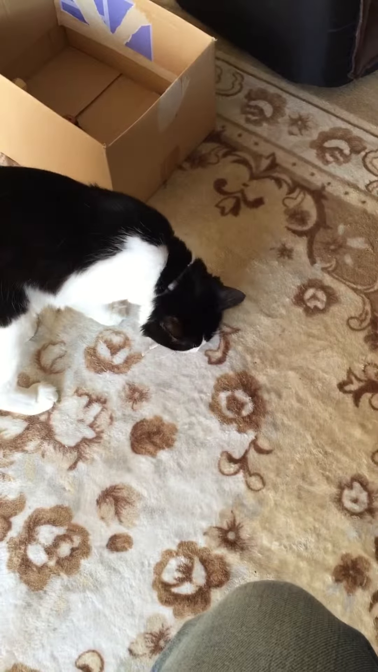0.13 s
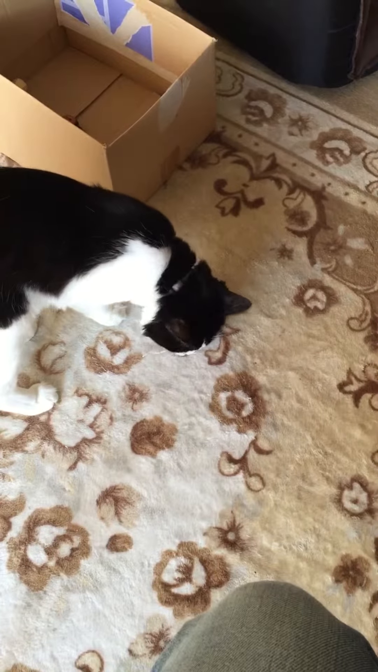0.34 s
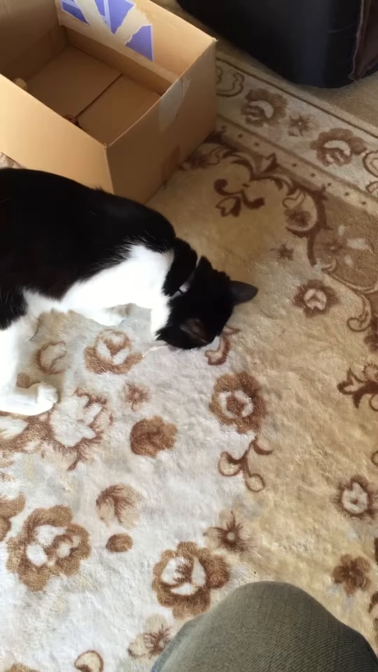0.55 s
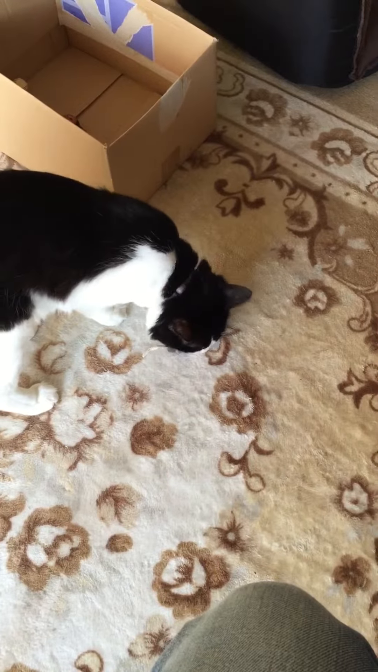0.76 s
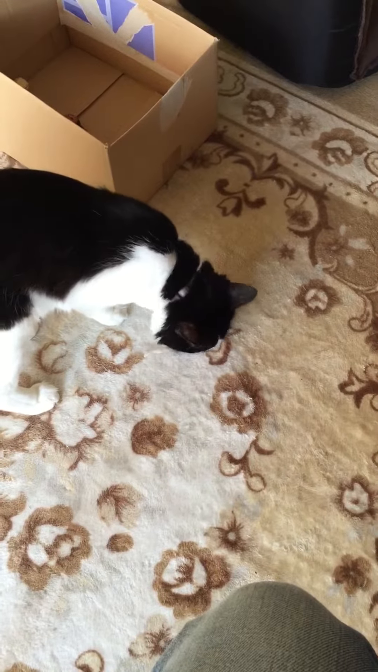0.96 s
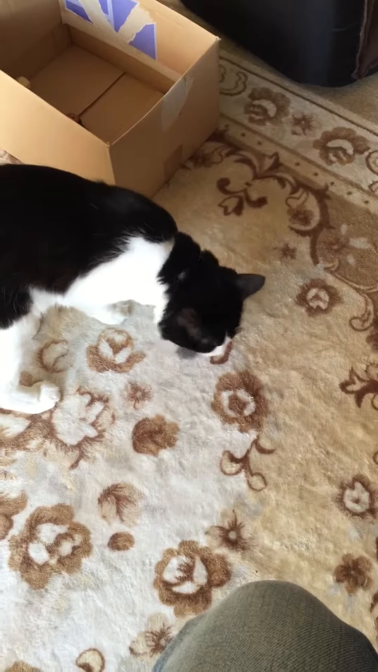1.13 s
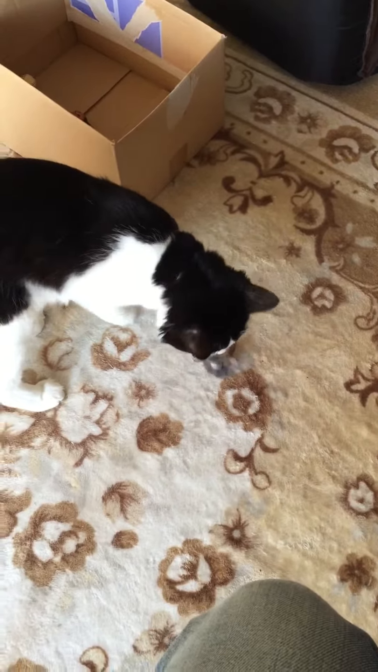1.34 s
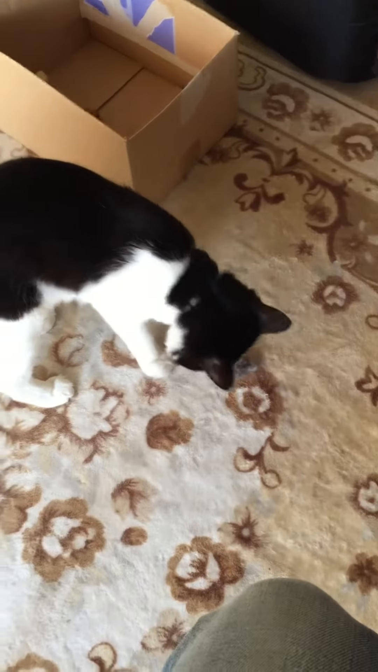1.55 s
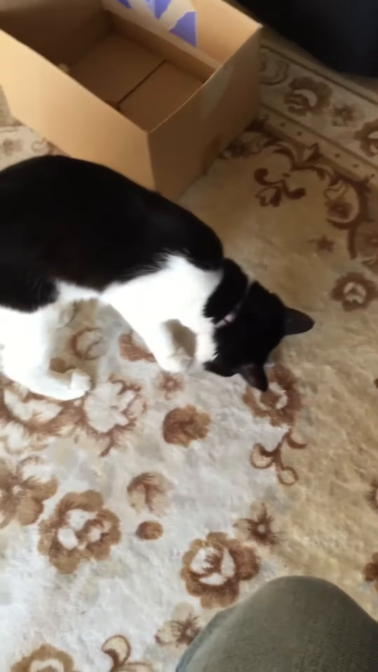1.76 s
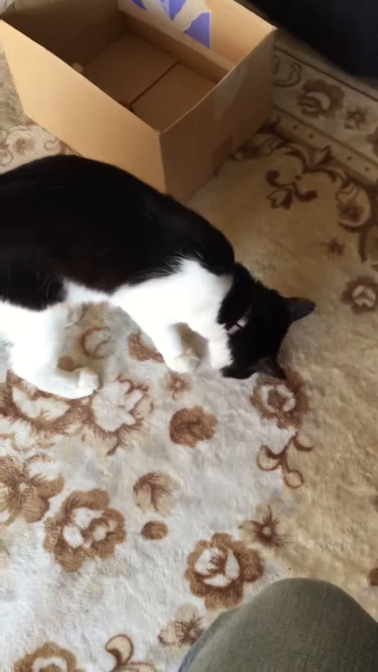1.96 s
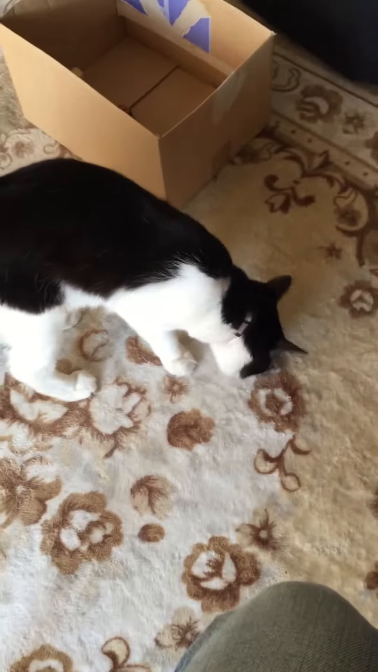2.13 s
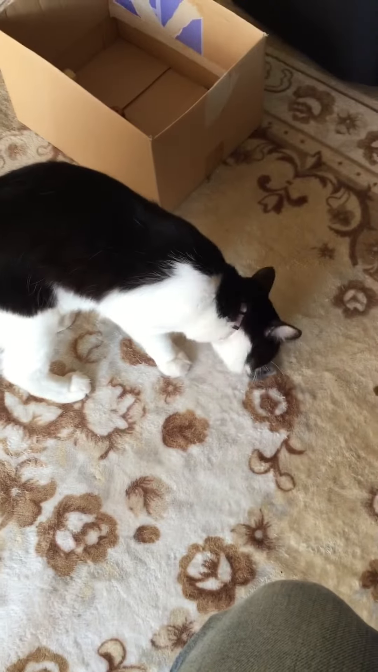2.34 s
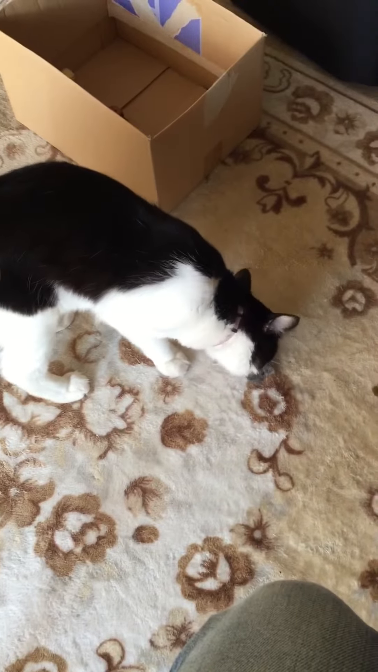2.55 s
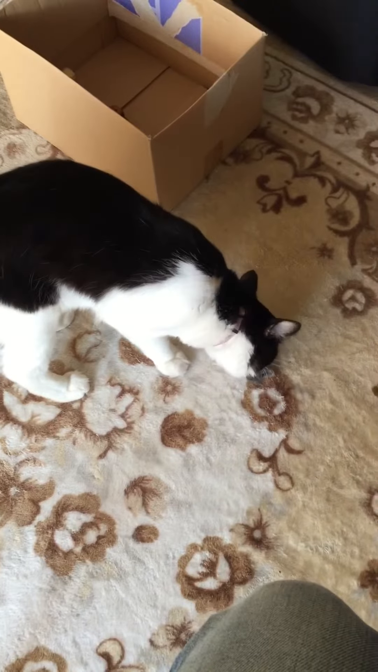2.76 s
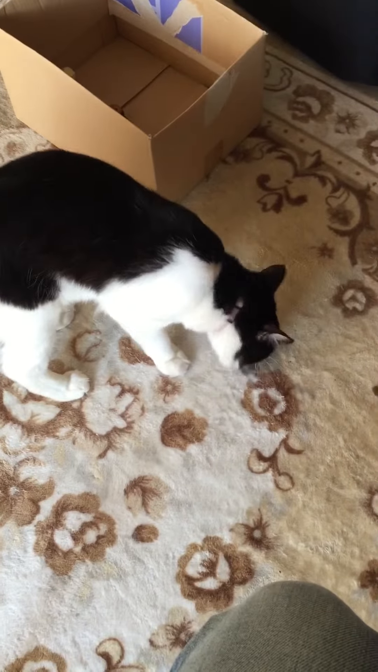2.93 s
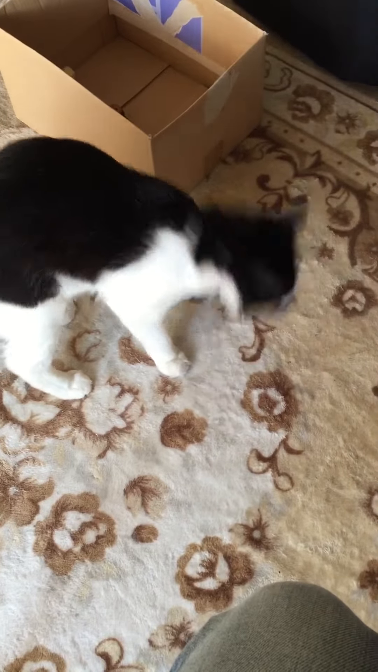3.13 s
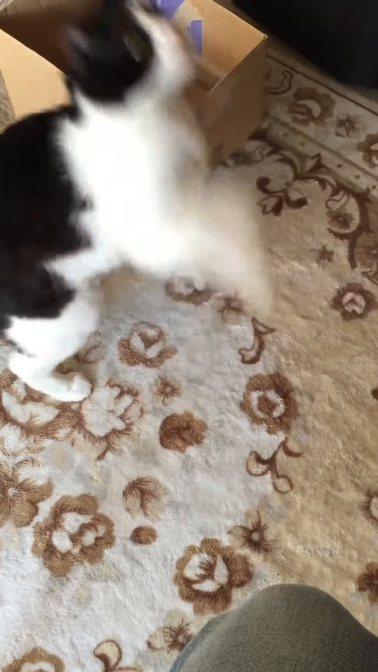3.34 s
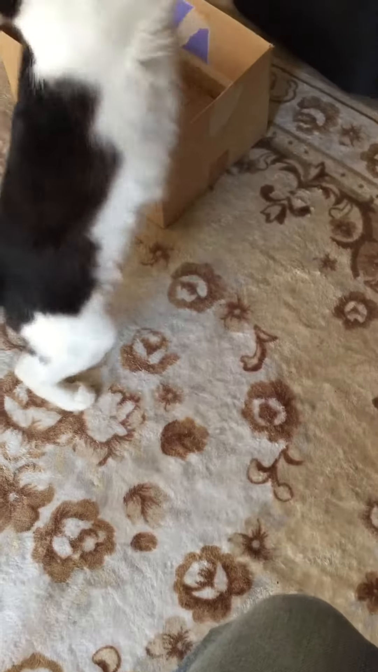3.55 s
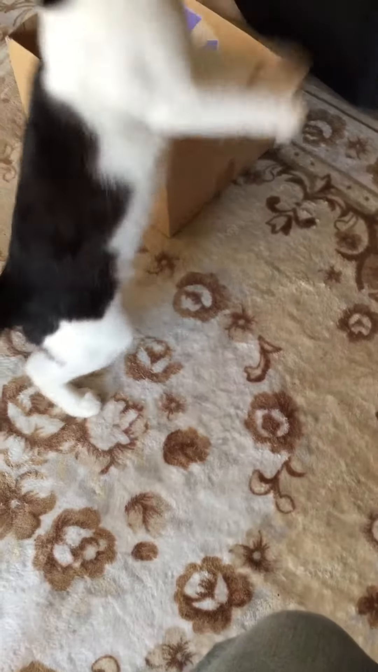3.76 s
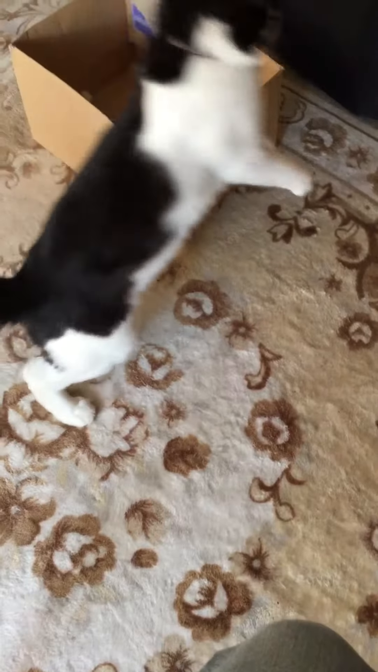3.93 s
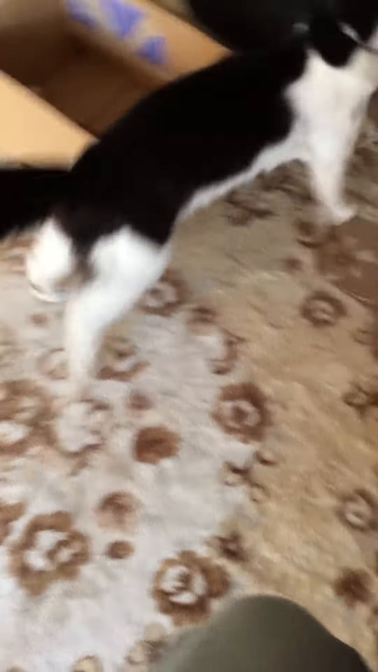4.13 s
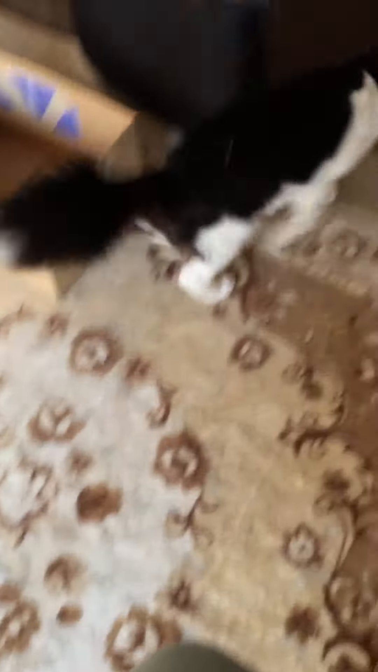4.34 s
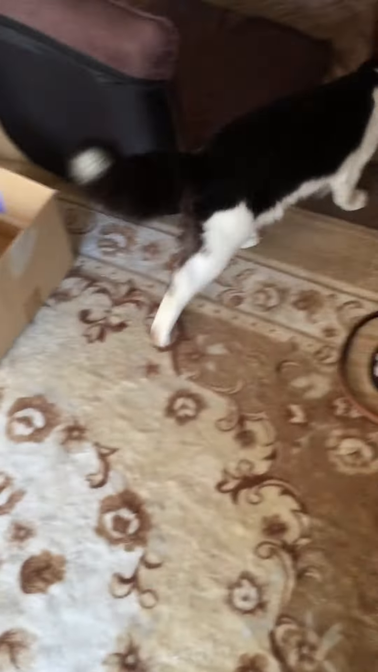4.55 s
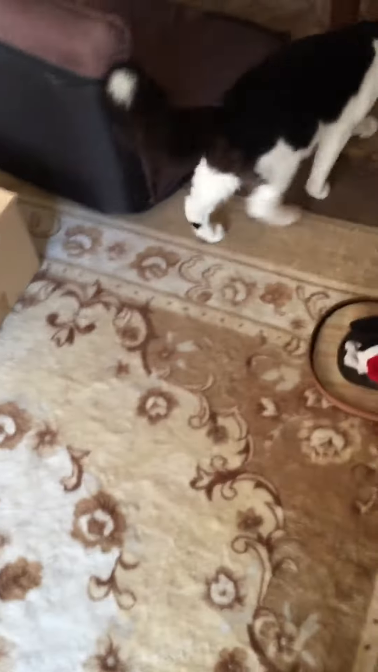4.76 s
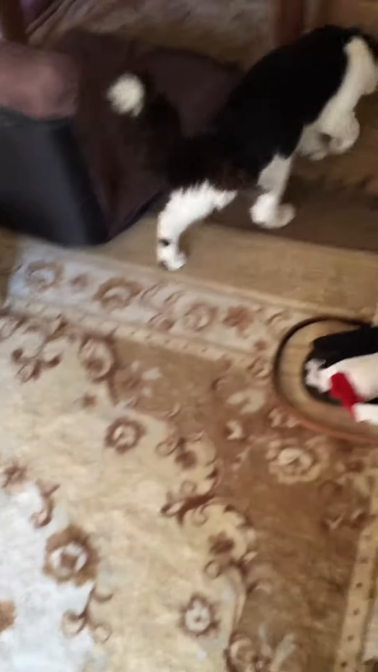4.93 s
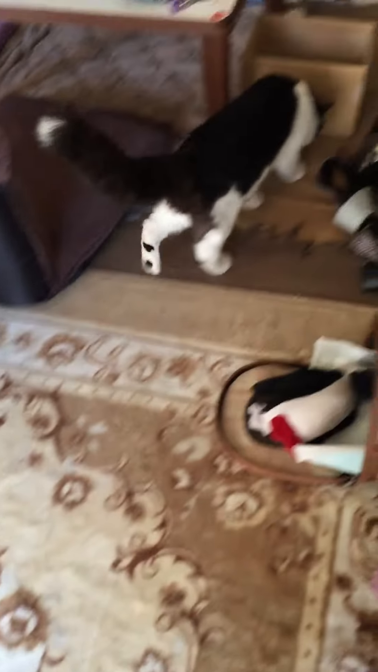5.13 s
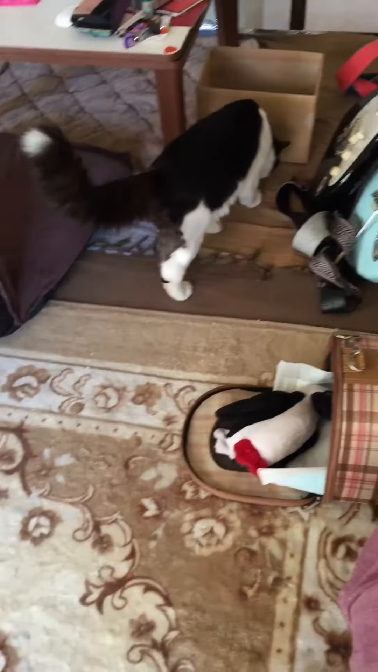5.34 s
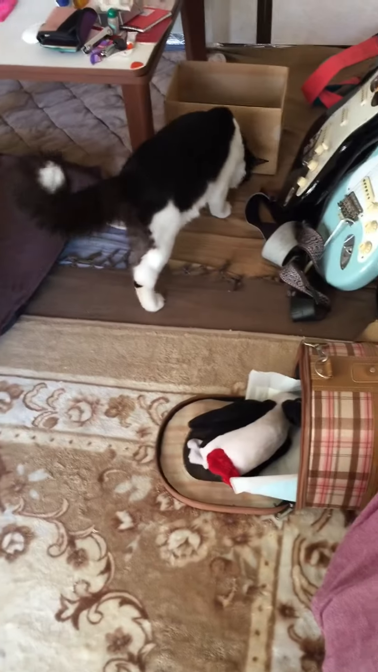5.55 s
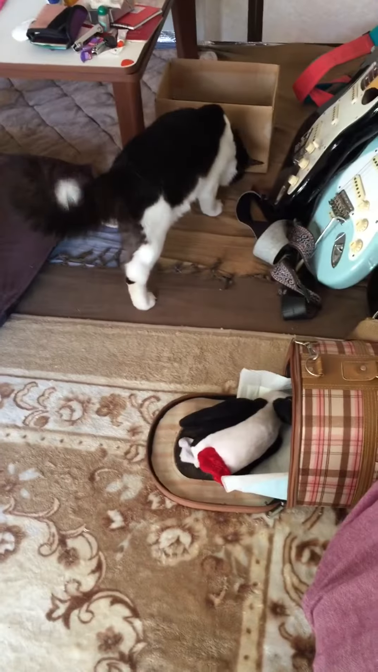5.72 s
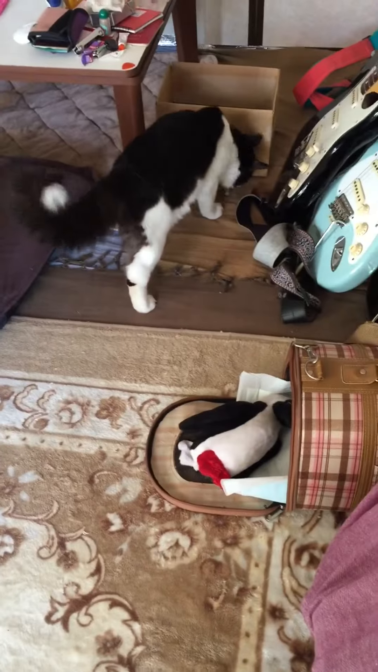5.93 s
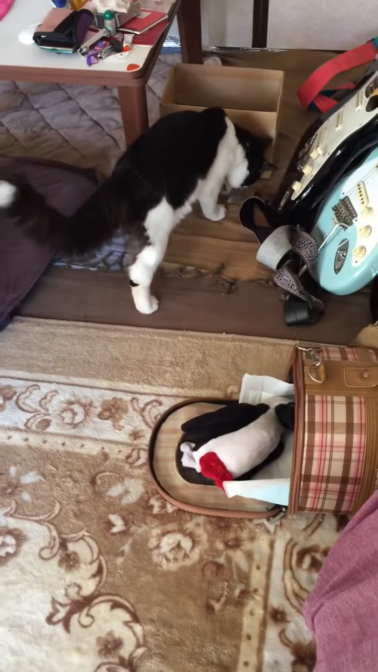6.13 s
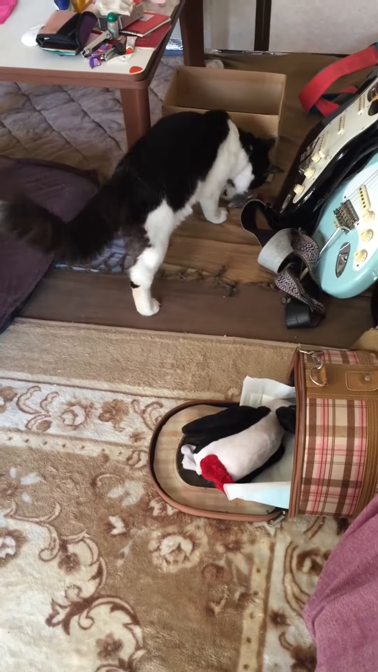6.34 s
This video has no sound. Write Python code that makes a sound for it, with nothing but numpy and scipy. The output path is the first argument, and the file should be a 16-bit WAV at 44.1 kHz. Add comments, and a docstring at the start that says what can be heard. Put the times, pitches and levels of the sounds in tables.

```python
"""In a quiet living room a cat worries a small rattle toy on a rug, flings it up and leaps after it.
Beads tick and tap on the toy's hollow shell, as decaying modes, and slide along it as streams of clicks.
A swat of bright noise bursts is followed by a sharp knock on wood, built from dispersed decaying modes.
Paws thud softly as swells of dull noise, over the low noise hum of the room and a far two-tone drone
that fades away."""
import sys
import numpy as np
from scipy import signal
from scipy.fft import rfft, irfft
from scipy.io import wavfile

SR = 44100
rng = np.random.default_rng(int(sys.argv[2]) if len(sys.argv) > 2 else 0)


def to_wav(s):
    """Save 16-bit WAV."""
    ch = np.atleast_2d(s).T  # columns
    pcm = np.round(np.clip(ch, -1, 1) * 32767)  # PCM
    wavfile.write(sys.argv[1], SR, pcm.astype(np.int16))


N = 286043
TIME = np.arange(N) / SR

# Levels in the tables are relative: the layers trim them further on.

# Slow level of the room's hum and rumble. Each row: time in seconds, level in dB.
RUMBLE_LEVEL = [(0, -50), (.6, -50.5), (1.3, -49.5), (2.35, -58), (2.6, -53.5), (3.5, -59), (4.0, -52.5),
                (4.7, -55.5), (5.1, -64.5), (5.6, -56.5), (6.49, -63)]
# Tone of the rumble. Each row: frequency in Hz, density in dB per Hz.
RUMBLE_COLOUR = [(55, -6.5), (78, 0), (95, 4.5), (120, -10.5), (155, -4), (195, -12.5), (240, -15),
                 (290, -18.5), (400, -28)]
# Tone of the steady background. Each row: frequency in Hz, density in dB per Hz.
FLOOR_COLOUR = [(25, -22.5), (45, -2.5), (65, -1), (120, -14), (250, -14.5), (370, -22.5), (550, -24.5),
                (1000, -26.5), (2300, -31), (3500, -33.5), (5000, -36.5), (9000, -40), (10500, -42),
                (16000, -43.5)]
# The far drone. Each row: time in seconds, low tone in dB, high tone in dB.
DRONE_LEVELS = [(0.0, -51.5, -59), (0.67, -63, -68), (0.95, -59, -53.5), (1.6, -52, -67.5),
                (1.87, -63, -67), (2.02, -45.5, -65), (2.27, -65, -82), (2.3, -79, -71)]
DRONE_LOW_HZ, DRONE_RISE_HZ_PER_S, DRONE_HIGH_HZ, DRONE_FADE_S = 90, 2.627, 150.3, 0.12

# Shakes of the toy, each a swell of moving beads. Each row: time of the top in seconds, rise in seconds,
# fall in seconds, tapping in dB, sliding in dB, sliding treble in dB, shell pitch in Hz.
SHAKES = [(0.01, 0.027, 0.012, -48.5, -60, -76.5, 1790), (0.394, 0.0024, 0.0064, -57, -74, -66.5, 2620),
          (1.265, 0.027, .025, -62, -70, -66.5, 2300), (1.382, 0.017, 0.04, -48, -68, -60, 2130),
          (1.545, 0.028, 0.034, -52, -76, -73, 2200), (2.043, 0.013, 0.008, -45, -76, -90, 2300),
          (2.985, .015, 0.0092, -57, -57, -58.5, 2010), (3.085, 0.03, 0.021, -64, -66, -70, 2080),
          (3.2, 0.032, 0.01, -63, -63, -70, 2600), (3.578, 0.00099, 0.011, -37, -48, -52, 1550),
          (3.615, 0.013, 0.051, -46, -48.5, -67, 2050), (3.65, 0.0078, 0.0096, -48, -64, -51.5, 2000),
          (4.35, .014, 0.046, -36.5, -43.5, -48.5, 2210), (4.455, .03, 0.018, -46, -53.5, -64, 2280),
          (4.688, .055, 0.012, -44, -50, -59, 2100), (5.535, 0.032, .035, -59.5, -67.5, -69.5, 2800),
          (5.86, .008, 0.0086, -55, -51, -77, 2480), (6.06, .018, 0.034, -58, -68, -78, 2506),
          (6.21, .02, 0.033, -59, -72, -91, 2510), (6.377, .045, 0.009, -47.5, -61, -76, 2140)]
# Ring of the sliding beads. Each row: frequency in Hz, density in dB per Hz.
SLIDE_RING = [(1300, -20.5), (1700, -3), (2000, -5.5), (2280, 1.5), (2650, -6), (3100, -8), (3500, -8),
              (4100, -8.5), (5000, -28), (6000, -19.5)]
# Brightness of bead snaps and slides. Each row: frequency in Hz, density in dB per Hz.
BEAD_TREBLE = [(1400, -6), (2500, -4.5), (3600, 5), (4300, 6.5), (5000, -4.5), (6200, 0), (7500, -5.5),
               (9000, -6), (10400, -12), (12000, -5.5), (16000, -13.5)]
# Modes of the toy's shell. Each row: pitch as a ratio to the lowest mode, width in Hz, level in dB.
SHELL_MODES = [(1, 165.9, 4.5), (1.109, 197.5, -12), (1.449, 345.6, -23), (1.95, 452, -16),
               (2.62, 345, -48)]
STRAYS_PER_S, STRAY_SPREAD_DB = 100, 2.5  # mean rate; spread either way
# The clearest beads striking the shell. Each row: start in seconds, ring in dB, snap energy in dB,
# shell pitch in Hz, contact length in seconds.
TICKS = [(1.3698, -41, -24, 2180, 0.0024), (1.3782, -29.5, -23.5, 2040, 0.00081),
         (1.404, -39.5, -49, 2130, .001), (1.517, -45.5, -35, 2130, .0015), (1.531, -47, -39, 2170, .0015),
         (1.591, -42, -40, 2220, 0.0022), (2.981, -54, -32, 2100, 0.0039),
         (3.081, -51, -32.5, 2060, 0.0014), (3.194, -50, -32, 2650, 0.0049),
         (3.342, -48, -36.5, 2630, 0.0036), (3.3923, -55, -33.5, 2730, 0.0019),
         (3.575, -32, -12.5, 2380, 0.00076), (3.6072, -27.5, -19, 2050, 0.0012),
         (3.625, -36, -33, 2050, 0.0022), (3.645, -35, -21, 1960, 0.0036), (3.725, -54, -40, 1990, 0.0012),
         (4.1358, -60, -40, 2180, 0.00081), (4.326, -62, -16, 2320, 0.0025),
         (4.3407, -44, -19, 2160, 0.0016), (4.3665, -42, -28, 2350, 0.00052),
         (4.4046, -35, -20, 1980, 0.00055), (4.428, -48, -30, 2260, .0005),
         (4.4523, -53.5, -29, 2320, 0.00055), (4.641, -43, -33, 1850, 0.0017),
         (4.674, -44, -33, 2110, 0.0032), (5.854, -51, -40, 1990, 0.0024),
         (6.343, -45.5, -56, 2080, 0.0021)]
# until they open, the cat's jaws damp the shell's upper ring
JAWS_OPEN_S, JAWS_BAND_HZ, JAWS_LOSS_DB = 2.6, (2800, 5000), 8

# Soft paw falls. Each row: start in seconds, level in dB, length in seconds (twice the time to the peak).
PAWS = [(3.154, -50, 0.018), (4.623, -53, .054), (5.362, -47.5, 0.018), (5.434, -48, 0.026),
        (5.507, -37, 0.031), (5.58, -49, 0.014), (5.667, -49, 0.03)]
# Tone of the thuds. Each row: frequency in Hz, density in dB per Hz.
PAW_COLOUR = [(45, -23), (70, -0.5), (95, 9.5), (130, -11), (190, -12), (235, -14), (275, -9.5),
              (370, -27.5), (600, -42.5)]

# Tone of the swat. Each row: frequency in Hz, density in dB per Hz.
SWAT_COLOUR = [(200, -0.5), (430, -8), (720, -4), (1000, -13), (1330, 1), (1520, -1), (1750, -8), (2000, 2),
               (2230, 4), (2420, -5.5), (2750, -1), (3200, -7), (4200, -10), (5500, -14), (7000, -13.5),
               (9500, -10), (12000, -12.5), (16000, -21)]
# swat in mid-air: a graze, a hit, then ever weaker scratches
SWAT_S, SWAT_DB = 4.0455, -26.5
GRAZE_LEAD_S, GRAZE_DB = 0.0023, -14  # graze level is relative to the hit
SCRATCH_GAP_S, SCRATCH_LOSS_DB = .0062, 3

# Blows on wood. Each row: start in seconds, level in dB, contact cut-off in Hz.
BLOWS = [(4.0459, -20.5, 159.2), (4.2656, -11, 3200)]
# Wood modes. Each row: frequency in Hz, level in dB, 60 dB decay in seconds before the damping factor.
WOOD_MODES = [(166, -22.5, 0.2), (198.4, -27, .3), (228, -13.5, 0.22), (282, -22, .18), (344.6, -14.5, .04),
              (401, -1, .062), (433, -7, .086), (630, -9.5, .11), (688, -17.5, .19), (720, 2.6, .043),
              (846, -0.65, .031), (975, -2.5, .029), (1053, -13, .125), (1166, -8, 0.04),
              (1270.3, -5, .016), (1413, -19, .11), (1487, -10, 0.033), (1702, -22, 0.12),
              (1820, -21.5, .09), (2104, -20, .08)]
# Tone of the crack in the hard knock. Each row: frequency in Hz, density in dB per Hz.
KNOCK_CRACK = [(1000, -1.5), (1900, -2), (2550, -18.5), (2830, 0), (3000, -9.5), (3400, -2), (4000, -9.5),
               (5000, -16), (8000, -13.5), (12000, -20.5), (16000, -23)]

# The knock comes back from the nearest walls. Each row: delay in seconds, level in dB.
WALL_ECHOES = [(.01465, -18), (.03174, -17), (.04898, -20.5)]
# Decay of the room's reflections. Each row: frequency in Hz, time to fall by 60 dB in seconds.
ROOM_T60 = [(150, 0.2), (400, 0.27), (900, 0.22), (2200, 0.18), (5000, 0.22), (15000, 0.11)]
CUTOFF_HZ = 15900  # top of the finished sound


def from_db(db):
    """Turn decibels into an amplitude gain."""
    return 10 ** (np.asarray(db) / 20)


def rms_one(x):
    """Scale to unit power."""
    return x / np.sqrt(np.mean(x ** 2) + 1e-20)


def at_hz(points, hz):
    """Read a table on a log-frequency axis."""
    table_hz, value = np.transpose(points)
    return np.interp(np.log(hz + 1e-3), np.log(table_hz), value)


def cut(x, hz, kind, order=2):
    """Butterworth filter: low, high or band."""
    safe_hz = np.clip(hz, 10, .45 * SR)
    sections = signal.butter(order, safe_hz, kind, fs=SR, output="sos")
    return signal.sosfilt(sections, x + 1e-18)


def colour(x, spectrum, size=8192):
    """Causal filter of unit energy with the given spectrum, falling steeply beyond its ends."""
    hz = np.maximum(np.fft.rfftfreq(size, 1 / SR), 1)
    octaves_outside = np.abs(np.log2(hz / np.clip(hz, spectrum[0][0], spectrum[-1][0])))
    level_db = at_hz(spectrum, hz) - np.minimum(30 * octaves_outside, 70)
    # folding the cepstrum gives minimum phase: no sound ahead of the contact
    cepstrum = irfft(np.log(from_db(level_db)))
    cepstrum[1:size // 2] *= 2
    cepstrum[size // 2 + 1:] = 0
    response = irfft(np.exp(rfft(cepstrum)))
    return signal.fftconvolve(x, response / np.linalg.norm(response))[:N]


def add(out, s, sound):
    """Mix a sound in at a time in seconds."""
    i = round(s * SR)
    out[i:i + len(sound)] += sound[:N - i]


def burst(decay_s):
    """A contact: noise that starts at full strength and decays exponentially."""
    t = TIME[:SR // 10]
    return rng.standard_normal(len(t)) * np.exp(-t / decay_s)


def room_tone(hum_hz, hum_width_hz, hum_db, rumble_db, floor_db):
    """Rumble with a wavering narrow-band hum in it, over a faint steady background."""
    hum_noise, rumble_noise, floor_noise = rng.standard_normal((3, N))
    hum_edges = [hum_hz - hum_width_hz / 2, hum_hz + hum_width_hz / 2]
    hum = from_db(hum_db) * rms_one(cut(hum_noise, hum_edges, "band"))
    rumble = from_db(rumble_db) * colour(rumble_noise, RUMBLE_COLOUR)
    level = from_db(np.interp(TIME, *np.transpose(RUMBLE_LEVEL)))
    floor = from_db(floor_db) * colour(floor_noise, FLOOR_COLOUR)
    return (hum + rumble) * level + floor


def drone(low_db, high_db, waver_db, waver_hz):
    """Two low tones from far off waver and fade away; the lower one creeps up in pitch."""
    s, low, high = np.transpose(DRONE_LEVELS)
    low_hz = DRONE_LOW_HZ + DRONE_RISE_HZ_PER_S * TIME
    high_hz = np.full(N, DRONE_HIGH_HZ)
    out = np.zeros(N)
    for hz, db in ((low_hz, low + low_db), (high_hz, high + high_db)):
        waver = waver_db * rms_one(cut(rng.standard_normal(N), waver_hz, "low"))
        tone = rms_one(np.sin(2 * np.pi * np.cumsum(hz) / SR))
        out += from_db(np.interp(TIME, s, db) + waver) * tone
    return out * np.exp(-np.maximum(TIME - s[-1], 0) / DRONE_FADE_S)


def swell(s, rise_s, fall_s):
    """A shake grows and dies exponentially around its top."""
    distance = np.maximum((s - TIME) / rise_s, (TIME - s) / fall_s)
    return np.exp(-np.minimum(distance, 20))


def bead_slides(per_s, spread_db, ring_db, treble_db, dull_hz):
    """Loose beads run along the shell as a dense stream of tiny uneven clicks."""
    sizes = from_db(spread_db * np.minimum(rng.exponential(1, N), 4))
    signs = rng.choice([-1, 1], N)
    clicks = rng.random(N) < per_s / SR
    grains = rms_one(sizes * signs * clicks)
    ring, treble = np.zeros(N), np.zeros(N)
    for s, rise_s, fall_s, _, slide_level, treble_level, _ in SHAKES:
        stream = grains * swell(s, rise_s, fall_s)
        ring += from_db(slide_level + ring_db) * stream
        treble += from_db(treble_level + treble_db) * stream
    return colour(ring, SLIDE_RING) + cut(colour(treble, BEAD_TREBLE), dull_hz, "low", order=1)


def shell(hz, swell_s):
    """One ring of the hollow shell: decaying modes of chance strength, with a softened onset."""
    t = TIME[:SR // 40]
    chances_db = rng.standard_normal(len(SHELL_MODES))
    ring = np.zeros(len(t))
    for (ratio, width_hz, db), chance_db in zip(SHELL_MODES, chances_db):
        # a wider resonance dies sooner
        decay = np.exp(-np.pi * width_hz * t)
        ring += from_db(db + chance_db) * decay * np.sin(2 * np.pi * ratio * hz * t)
    return ring * (1 - np.exp(-t / swell_s))


def stray_beads(ring_db, swell_s):
    """While the toy moves, lone beads tap the shell at uneven intervals and ring its modes."""
    out = np.zeros(N)
    for s, rise_s, fall_s, tap_level, _, _, hz in SHAKES:
        start = max(s - 4 * rise_s, 0)
        gap_chance, level_chance = rng.random((2, 80))
        times = start + np.cumsum(.5 + gap_chance) / STRAYS_PER_S
        level_db = tap_level + ring_db + STRAY_SPREAD_DB * (2 * level_chance - 1)
        strengths = np.interp(times, TIME, swell(s, rise_s, fall_s)) * from_db(level_db)
        ring = shell(hz, swell_s)
        for at, strength in zip(times[times < TIME[-1]], strengths):
            add(out, at, strength * ring)
    return cut(out, 1250, "high", order=4)


def bead_ticks(ring_db, snap_db, swell_s, hardness):
    """Each bead gives a dry snap and rings the shell, whose pitch shifts with the cat's grip."""
    rings, snaps = np.zeros(N), np.zeros(N)
    for s, ring_level, snap_level, hz, length_s in TICKS:
        add(rings, s, from_db(ring_level + ring_db) * shell(hz, swell_s))
        # the shorter the contact, the brighter the snap
        snap = cut(burst(length_s), hardness / length_s, "low", order=1)
        add(snaps, s, from_db(snap_level + snap_db) * snap / np.linalg.norm(snap))
    return cut(rings + colour(snaps, BEAD_TREBLE), 1250, "high", order=4)


def in_jaws(x):
    """While the cat bites the toy, its upper ring is muted."""
    held = TIME < JAWS_OPEN_S
    upper_ring = cut(x, JAWS_BAND_HZ, "band", order=1)
    return x - (1 - from_db(-JAWS_LOSS_DB)) * held * upper_ring


def paws():
    """Padded feet push on the floor: dull thuds of noise that swell and fade."""
    out, t = np.zeros(N), TIME[:SR // 2]
    for s, db, length_s in PAWS:
        age = 2 * t / length_s
        push = age * np.exp(1 - age)
        add(out, s, from_db(db) * push * rng.standard_normal(len(t)))
    return colour(out, PAW_COLOUR)


def swat(decay_s, count):
    """Claws graze the toy, catch it and slip off in a few bright scratches of decaying noise."""
    out = np.zeros(N)
    add(out, SWAT_S - GRAZE_LEAD_S, from_db(SWAT_DB + GRAZE_DB) * burst(decay_s))
    for k in range(count):  # the first is the hit
        level = from_db(SWAT_DB - k * SCRATCH_LOSS_DB)
        add(out, SWAT_S + k * SCRATCH_GAP_S, level * burst(decay_s))
    return colour(out, SWAT_COLOUR)


def knocks(crack_db, crack_s, travel_s, damping, low_hz, top_hz):
    """Blows ring the wood; a soft contact reaches only the low modes, the last, hard one also cracks."""
    out, crack, wood = np.zeros(N), np.zeros(N), np.zeros(N)
    t = TIME[:SR // 2]
    for hz, db, t60 in WOOD_MODES:
        # bending waves are dispersive: high modes arrive first
        arrival_s = travel_s * np.sqrt(WOOD_MODES[0][0] / hz)
        decay = from_db(db - 60 * damping * t / t60)
        add(wood, arrival_s, decay * np.sin(2 * np.pi * hz * t))
    for s, db, contact_hz in BLOWS:
        add(out, s, cut(wood, contact_hz, "low") * from_db(db))
    add(crack, BLOWS[-1][0], from_db(crack_db) * burst(crack_s))
    radiated = cut(cut(out, low_hz, "high", order=4), top_hz, "low", order=4)
    return radiated + colour(crack, KNOCK_CRACK)


def walls(x):
    """Add a few distinct early echoes, each a delayed, weaker copy."""
    out = x.copy()
    for delay_s, db in WALL_ECHOES:
        add(out, delay_s, from_db(db) * x)
    return out


def room(x, wet_db, first_s, build_s):
    """Diffuse reflections that build up after the first wall and die band by band."""
    t = TIME[:SR // 2]
    tail = np.zeros(len(t))
    edges = np.geomspace(90, 18000, 12)
    for low, high in zip(edges, edges[1:]):
        band = cut(rng.standard_normal(len(t)), [low, high], "band")
        t60 = at_hz(ROOM_T60, np.sqrt(low * high))
        tail += band * from_db(-60 * t / t60)
    tail *= np.clip((t - first_s) / build_s, 0, 1)
    reflections = signal.fftconvolve(x, tail / np.linalg.norm(tail))[:N]
    return x + from_db(wet_db) * reflections


def scene():
    """Mix toy, knock and paws over the room's own hum and the far drone."""
    tone = room_tone(hum_hz=96, hum_width_hz=23, hum_db=-9.5, rumble_db=-3.5, floor_db=-61.5)
    far = drone(low_db=-1.0, high_db=-2.0, waver_db=1.3, waver_hz=14)
    slides = bead_slides(per_s=730, spread_db=2.5, ring_db=-2.5, treble_db=1.5, dull_hz=11000)
    strays = stray_beads(ring_db=0.5, swell_s=0.0009)
    ticks = bead_ticks(ring_db=-1.5, snap_db=-3.5, swell_s=.0007, hardness=14.0)
    beads = in_jaws(slides + strays + ticks)
    toy = room(beads + swat(decay_s=0.002, count=6), wet_db=-10.0, first_s=0.0021, build_s=0.0034)
    knock = walls(knocks(crack_db=-30.5, crack_s=.012, travel_s=0.0009, damping=0.99, low_hz=187, top_hz=2184))
    wood = room(knock, wet_db=-15.5, first_s=.005, build_s=.005)
    return (tone + far + toy + paws() + wood)[None]


def record(dry):
    """Cut the top steeply with an elliptic low-pass."""
    return signal.sosfilt(signal.ellip(10, .2, 70, CUTOFF_HZ, fs=SR, output="sos"), dry)


dry = scene()
out = record(dry)
to_wav(out)
```